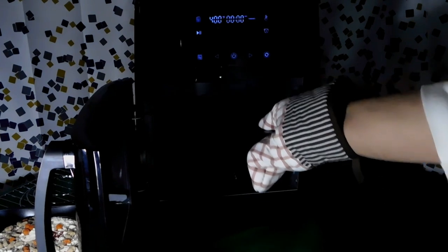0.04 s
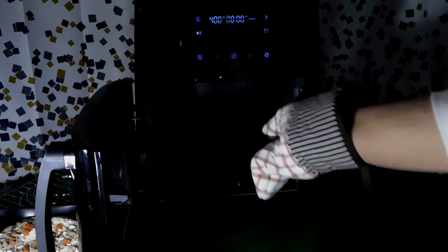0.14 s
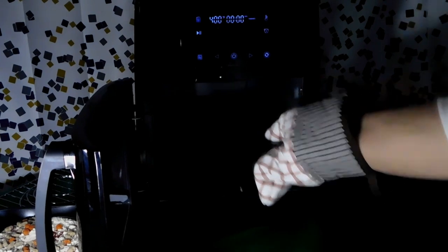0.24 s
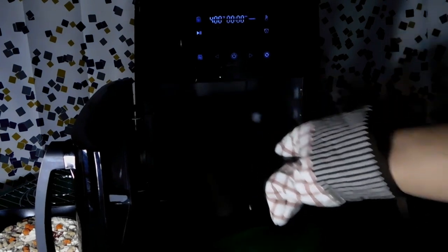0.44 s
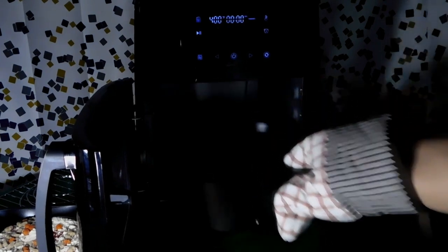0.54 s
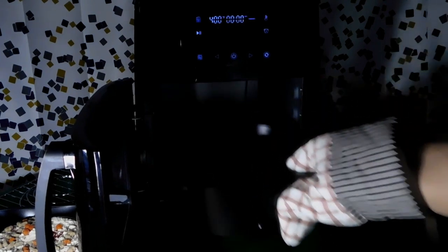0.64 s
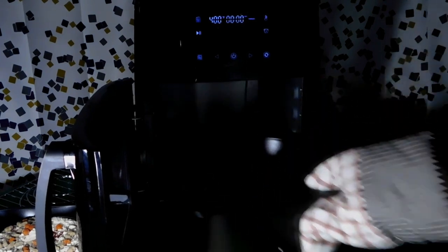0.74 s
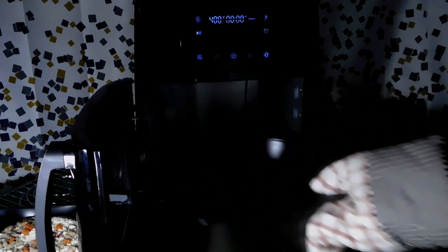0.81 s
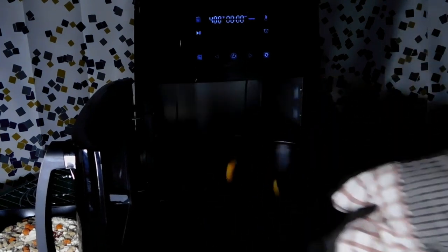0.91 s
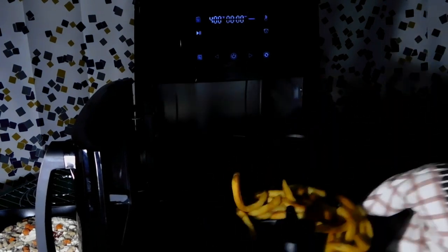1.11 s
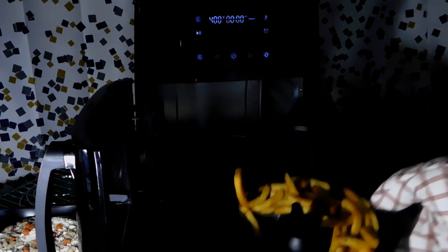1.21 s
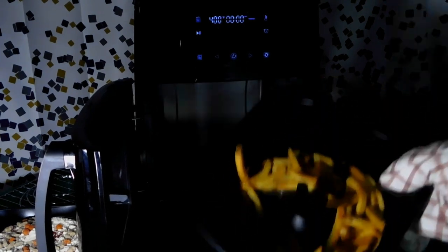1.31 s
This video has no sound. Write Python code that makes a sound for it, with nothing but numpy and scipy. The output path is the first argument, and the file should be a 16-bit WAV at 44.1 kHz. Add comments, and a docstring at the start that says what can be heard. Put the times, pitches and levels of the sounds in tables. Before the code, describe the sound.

A plastic air fryer drawer clunks free, slides out and clicks in a quiet kitchen.

```python
"""A quiet kitchen, close up: an air fryer drawer is pulled out. It strains, snaps out of its
catch and scrapes along plastic runners, tiny slips waking resonances that swell and fade.
It knocks twice on the way, each blow cracking in the plastic, ringing the basket and thumping
the hollow housing. The rim clears the runner with a bright click and a few lighter knocks.
A short room echo and a steady hush sit underneath."""
import sys
import numpy as np
from scipy import signal
from scipy.fft import rfft, irfft
from scipy.io import wavfile
from scipy.ndimage import uniform_filter1d

SR = 44100
rng = np.random.default_rng(int(sys.argv[2]) if len(sys.argv) > 2 else 0)


def pcm_store(signal):
    """Save signal as 16-bit PCM."""
    levels = np.round(np.clip(np.atleast_2d(signal), -1, 1) * 32767)
    wavfile.write(sys.argv[1], SR, levels.astype(np.int16).T)


N = 59535
TIME, FREQS = np.arange(N) / SR, np.fft.rfftfreq(N, 1 / SR)

# stereo image of the drawer, how alike the two sides are: f/Hz, coherence
DRAWER_COHERENCE = [(100, .92), (400, 1), (1000, 0.66), (2000, 0.76), (4500, 0.48), (10000, 0.3)]
# how far the left side leads: f/Hz, phase/rad
LEFT_LEAD = [(100, -0.31), (400, 0.26), (1000, -0.37), (2100, -0.76), (4200, -0.36), (10000, -0.54)]
# balance, left over right: f/Hz, level/dB
LEFT_BALANCE = [(300, 0.4), (1100, 0.3), (2000, -0.9), (4500, -2), (10000, -3)]
# room tone spectrum: f/Hz, level/dB
HUSH_SPECTRUM = [(30, -6), (100, -15.5), (140, -28), (190, -6), (280, -5), (400, -1.5), (600, -23),
                 (820, 2.5), (1300, -1), (2300, -6.5), (3800, -12.5), (8000, -17.5), (16000, -25)]
# how alike the two sides of the room tone are: f/Hz, coherence
HUSH_COHERENCE = [(100, 1), (400, 0.68), (1000, 0.94), (2000, 0.059), (10000, 0.043)]
# friction along the pull: t/s, level/dB, brightness/(dB per octave)
SLIDE_ENVELOPE = [(0, -56.5, -2.5), (0.052, -50.5, -2), (.09, -57, -4), (0.144, -58.5, -1.5),
                  (.198, -34.5, -1), (0.221, -42, -1.5), (.30, -48, 2), (0.333, -37, -3.5),
                  (0.392, -38, -2), (0.442, -46.5, 0), (0.47, -41.5, -0.5), (.487, -46.5, 0.5),
                  (.515, -39.5, 1), (0.564, -47, 3), (0.593, -42, 2), (0.643, -43.5, 1), (.71, -36.5, 1),
                  (.78, -38.5, 1), (.86, -37.5, 0), (.93, -36.5, 0), (0.987, -37, 0), (1.013, -43.5, -2),
                  (1.05, -72, 5), (1.15, -57.5, -4)]
# plastic rubbing on plastic: f/Hz, level/dB
SCRAPE_SPECTRUM = [(30, -19), (110, -32.5), (200, -9), (300, 0), (600, -2), (1000, 2.5), (1900, 1),
                   (3300, -4), (5600, -10.5), (7500, -13.5), (12500, -22), (16000, -33)]
# resonances that swell and fade as the contact point travels:
# f/Hz, width/Hz, level over the scrape/dB, peak t/s, swell sigma/s
RUBBED_RESONANCES = [(566, 100, -0.5, 0.22, 0.49), (815, 40, 6.5, 0.72, 0.48), (1144, 33, 10.5, 0.46, 0.13),
                     (1325, 16, 17.5, 1.05, 0.094), (1432, 25, 10.5, 0.22, 0.14),
                     (1757, 34, 11, 0.67, 0.11), (1870, 96, 3.5, 0.81, 0.22), (2160, 130, 1, 1, 0.058),
                     (2350, 250, 12.5, 0.603, 0.018), (2907, 59, 5.5, 0.86, 0.098),
                     (3110, 26, -2, 0.82, 0.025), (3180, 40, 9.5, .54, .06), (3950, 140, 7.5, 0.64, 0.059),
                     (4060, 21, 18, 1.03, 0.036), (4865, 24, 10.5, 0.94, 0.062)]
# blows on the drawer: t/s, rise/s, crack level/dB, crack tilt/(dB per octave),
# ring level/dB, ring f/Hz, ring spread/octaves, thump level/dB, thump f/Hz
BLOWS = [(.190, 0.0064, -55, -6, -50, 1420, 0.23, -36, 350),
         (.2274, 0.00053, -27.5, -3, -21, 1100, 0.081, -29.5, 545),
         (.2418, 0.0015, -20, 1, -23, 2680, 0.41, -27, 540),
         (0.249, 0.0007, -25.5, 1.2, -23.5, 1290, 0.21, -35.5, 296),
         (0.2637, .001, -30.5, -5, -38.5, 2220, 0.46, -42, 547),
         (0.569, 0.0013, -39, -28, -36.5, 810, 0.37, -39.5, 287),
         (0.658, 0.00074, -23, -1.5, -21.5, 1605, 0.21, -26, 312),
         (.664, 0.003, -38.5, 10, -22, 910, 0.22, -22, 260),
         (.675, 0.00043, -31, 2, -18, 1526, 0.13, -31, 332),
         (0.8847, 0.00039, -21.5, 0.6, -25.5, 2100, 0.18, -24, 370),
         (0.8899, 0.0024, -31, 6, -32.5, 1260, 0.48, -27, 300),
         (1.032, 0.0044, -36.5, -8, -36.5, 800, 0.22, -41.5, 463),
         (1.0647, 0.00078, -34, -7, -35.5, 1100, 0.31, -30.5, 352),
         (1.079, 0.0027, -45, -3.5, -40.5, 850, .3, -40, 142)]
# dense short modes of the plastic: f/Hz, level/dB
CRACK_SPECTRUM = [(30, -31), (120, -24.5), (280, -10.5), (700, -6.5), (1700, -5.5), (3200, -5), (5200, -13),
                  (8000, -19), (12500, -32.5), (16000, -39)]
# their decay: f/Hz, t60/s
CRACK_DECAY = [(100, 0.3), (500, .1), (2000, 0.12), (6000, 0.062), (14000, 0.078)]
# ring of the basket: f/Hz, level/dB, t60/s
BASKET_MODES = [(817.5, -1, 0.13), (894, -2.5, 0.083), (1041, -5.5, 0.17), (1146, 1.5, 0.1),
                (1300, -5, 0.071), (1337, -6.5, 0.069), (1466, -1.5, 0.063), (1561, -2.5, 0.066),
                (1767, 3.5, 0.053), (2087, 3.5, 0.097), (2152, 1, 0.04), (2387, 2, 0.043), (2980, 0, 0.06),
                (4040, 2, 0.086)]
# body of the hollow housing: f/Hz, level/dB, t60/s
HOUSING_MODES = [(93, -10, 0.27), (168.3, -9, 0.19), (258.3, -3, 0.092), (289.6, -7.5, .12),
                 (356.3, 0, 0.097), (418.3, -1.5, .1), (476.6, -4.5, 0.16), (527.2, -1, 0.12),
                 (585.7, -4, 0.18), (637, -13, 0.36)]
# treble resonances of the rim: f/Hz, half-width/Hz, level/dB
RIM_RESONANCES = [(2900, 80, -5), (4010, 140, -1), (4480, 260, -2), (6050, 190, 0), (6650, 240, -4),
                  (7300, 300, -3), (8400, 200, -5), (9850, 280, -3), (10500, 260, -5), (12350, 220, -8),
                  (13300, 400, -10), (15100, 500, -19)]
# decay of the kitchen echo: f/Hz, t60/s
ROOM_DECAY = [(150, 0.41), (1000, 0.15), (4000, 0.18), (12000, 0.15)]


def amp(db):
    """Decibels to gain."""
    return 10 ** (np.asarray(db) / 20)


def unit(x):
    """Scales to an rms of one."""
    return x / np.sqrt(np.mean(x ** 2) + 1e-20)


def curve(points, hz):
    """Reads a table along a log-frequency axis."""
    freqs, values = np.transpose(points)
    return np.interp(np.log(hz + 1), np.log(freqs), values)


def add(mix, start_s, sound):
    """Lays a sound into the mix."""
    part = mix[:, round(start_s * SR):][:, :sound.shape[1]]
    part += sound[:, :part.shape[1]]


def noise():
    """Two unrelated channels of white noise."""
    return rng.standard_normal((2, N))


def stereo(channels, eq_db, coherence=DRAWER_COHERENCE):
    """Colours two unrelated channels and blends them into one wide source at unit rms."""
    left, other = rfft(channels)
    alike = curve(coherence, FREQS)
    right = (alike * left + np.sqrt(1 - alike ** 2) * other) * np.exp(-1j * curve(LEFT_LEAD, FREQS))
    lean = amp(curve(LEFT_BALANCE, FREQS) / 2)
    return unit(irfft(np.array([left * lean, right / lean]) * amp(eq_db), N))


def moving_eq(x, db_at):
    """Applies a gain in dB that depends on frequency and time."""
    hz, t, frames = signal.stft(x, SR, nperseg=256, noverlap=192)
    return signal.istft(frames * amp(db_at(hz[:, None], t)), SR, nperseg=256, noverlap=192)[1][:, :N]


def tilt(hz, db_per_octave, pivot_hz=1010):
    """A brightness slope in dB, flat below 600 Hz and above 9 kHz."""
    return db_per_octave * np.log2(np.clip(hz, 600, 9000) / pivot_hz)


def kitchen_hush(level_db=-58.5):
    """The steady room tone."""
    return amp(level_db) * stereo(noise(), curve(HUSH_SPECTRUM, FREQS), HUSH_COHERENCE)


def gap_ripple(x, depth_db=3, width_hz=55, life_s=0.11, frame=2048):
    """Weak, narrow resonances come and go at random as the gap behind the drawer opens."""
    frames = signal.stft(x, SR, nperseg=frame)[2]
    ripple = rng.standard_normal(frames.shape[1:])
    ripple = uniform_filter1d(ripple, round(width_hz * frame / SR), axis=0)
    ripple = uniform_filter1d(ripple, round(life_s * 2 * SR / frame), axis=1)
    return unit(signal.istft(frames * amp(depth_db * unit(ripple)), SR, nperseg=frame)[1][:, :N])


def runner_scrape(slips_per_s=2500, slip_share=0.44, judder_db=1, judder_hz=69.5):
    """Tiny slips judder through the drawer and wake its resonances; level and brightness waver."""
    times, level_db, brightness = np.transpose(SLIDE_ENVELOPE)
    slips = (rng.random(N) < slips_per_s / SR) * rng.choice([-1, 1], (2, N))
    friction = np.sqrt(slip_share) * unit(slips) + np.sqrt(1 - slip_share) * noise()
    judder = unit(irfft(rfft(rng.standard_normal(N)) / (1 + (FREQS / judder_hz) ** 4), N))
    rubbing = gap_ripple(stereo(friction * amp(judder_db * judder), curve(SCRAPE_SPECTRUM, FREQS)))
    scrape = moving_eq(rubbing, lambda hz, t: tilt(hz, np.interp(t, times, brightness)))
    scrape *= amp(np.interp(TIME, times, level_db))
    ringing = 0
    for hz, width_hz, db, peak_s, sigma_s in RUBBED_RESONANCES:
        swell = np.exp(-0.5 * ((TIME - peak_s) / sigma_s) ** 2)
        ringing += amp(db) * signal.lfilter(*signal.iirpeak(hz, hz / width_hz, SR), scrape * swell)
    return scrape + ringing


def struck_modes(modes, centre_hz, spread_octaves, rise_s):
    """Damped modes ring; where the blow lands favours those near one frequency."""
    t, ringing = TIME[:SR // 4], 0
    side = np.array([[0.5], [-0.5]])
    for hz, db, t60 in modes:
        detune, phase, scatter = rng.standard_normal(3)
        lead = curve(LEFT_LEAD, hz) + scatter * np.sqrt(1 - curve(DRAWER_COHERENCE, hz))
        excitation = np.exp(-0.5 * (np.log2(hz / centre_hz) / spread_octaves) ** 2)
        pan = amp(side * curve(LEFT_BALANCE, hz))
        tone = np.sin(2 * np.pi * (hz * (1 + 0.00099 * detune) * t + phase) + side * lead)
        ringing += excitation * amp(db - 60 * t / t60) * pan * tone
    return ringing * (1 - np.exp(-t / rise_s))


def drawer_knocks():
    """Each blow cracks in the plastic, rings the basket and thumps the housing."""
    mix = np.zeros((2, N))
    for start_s, rise_s, crack_db, slope, ring_db, ring_hz, spread, thump_db, thump_hz in BLOWS:
        plastic = stereo(noise(), curve(CRACK_SPECTRUM, FREQS) + tilt(FREQS, slope))
        crack = moving_eq(plastic[:, :SR // 3], lambda hz, t: -60 * t / curve(CRACK_DECAY, hz))
        attack = 1 - np.exp(-TIME[:crack.shape[1]] / rise_s)
        ring = struck_modes(BASKET_MODES, ring_hz, spread, rise_s)
        thump = struck_modes(HOUSING_MODES, thump_hz, spread_octaves=0.38, rise_s=0.0034)
        add(mix, start_s, amp(crack_db) * crack * attack)
        add(mix, start_s, amp(ring_db) * ring + amp(thump_db) * thump)
    return mix


def rim_click(start_s=1.0628, level_db=-34.5, rise_s=0.003, t60_s=0.068):
    """The rim flicks off the end of the runner and rings briefly in the treble."""
    mix = np.zeros((2, N))
    power = sum(amp(db) ** 2 / (1 + ((FREQS - hz) / half_width) ** 2) ** 2
                for hz, half_width, db in RIM_RESONANCES)
    envelope = np.minimum(TIME / rise_s, 1) * amp(level_db - 60 * TIME / t60_s)
    add(mix, start_s, stereo(noise(), 10 * np.log10(power)) * envelope)
    return mix


def kitchen_echo(x, level_db=-16.5, build_s=0.0061):
    """A short diffuse tail, each band dying at its own speed."""
    tail = moving_eq(stereo(noise(), eq_db=0), lambda hz, t: -60 * t / curve(ROOM_DECAY, hz))
    tail *= np.minimum(TIME / build_s, 1) ** 2
    return amp(level_db) * signal.fftconvolve(x, tail / np.linalg.norm(tail[0]), axes=1)[:, :N]


def scene():
    """The drawer up front, its echo and the room tone behind."""
    drawer = drawer_knocks() + rim_click() + runner_scrape()
    return drawer + kitchen_echo(drawer) + kitchen_hush()


def record(dry, cutoff_hz=15950):
    """A steep low-pass trims the highest air."""
    lowpass = signal.firwin(511, cutoff_hz, window=("kaiser", 9), fs=SR)
    return signal.oaconvolve(dry, lowpass[None], "same")


dry = scene()
out = record(dry)
pcm_store(out)
```